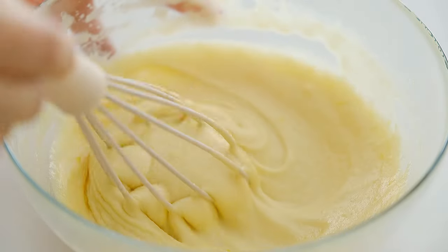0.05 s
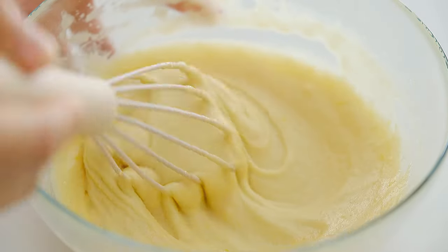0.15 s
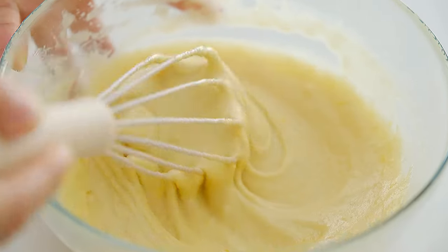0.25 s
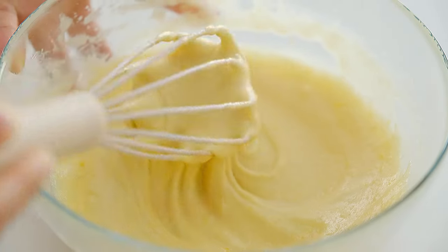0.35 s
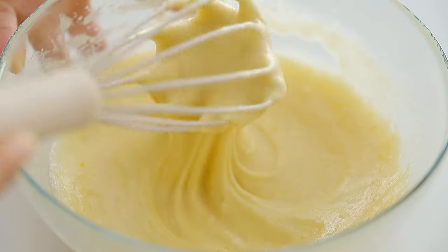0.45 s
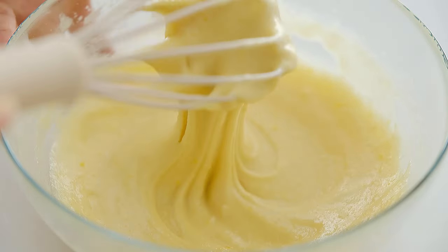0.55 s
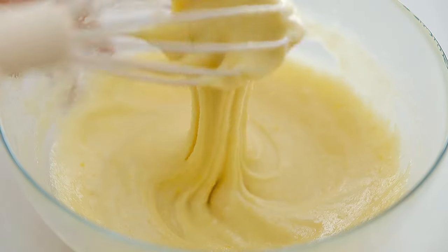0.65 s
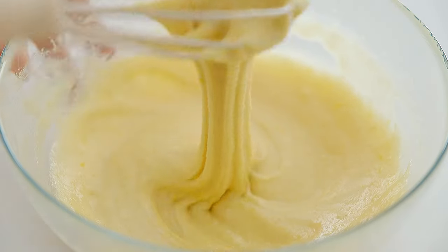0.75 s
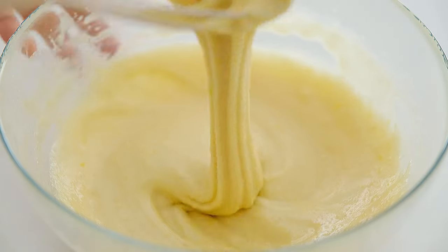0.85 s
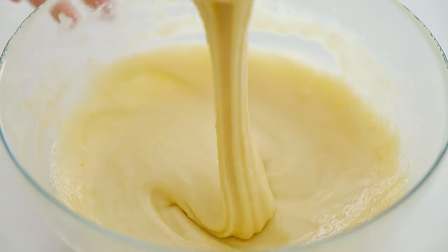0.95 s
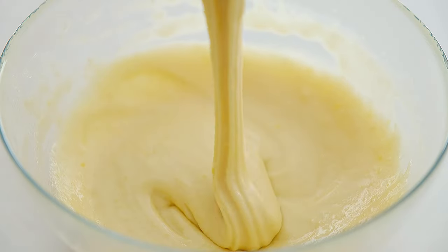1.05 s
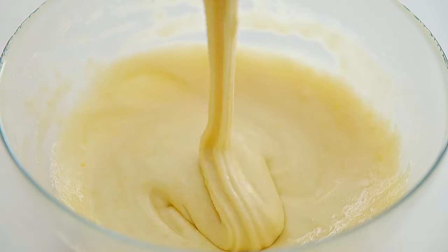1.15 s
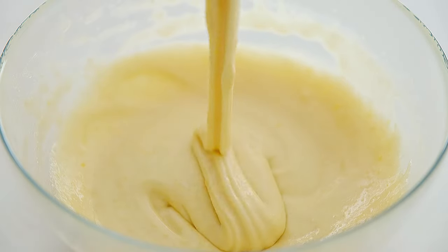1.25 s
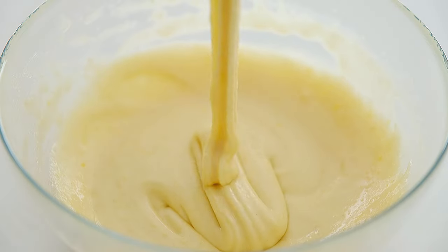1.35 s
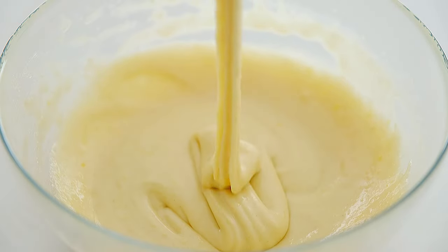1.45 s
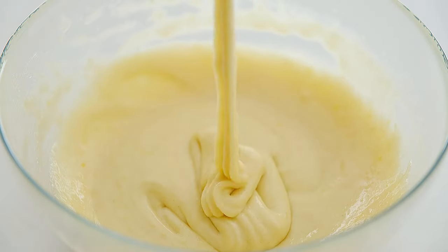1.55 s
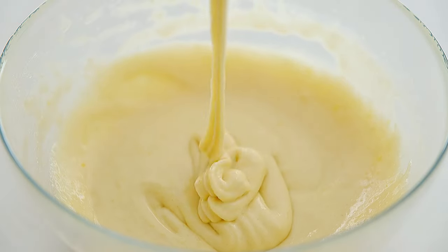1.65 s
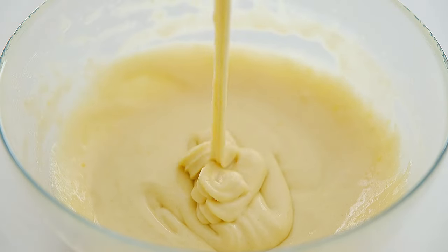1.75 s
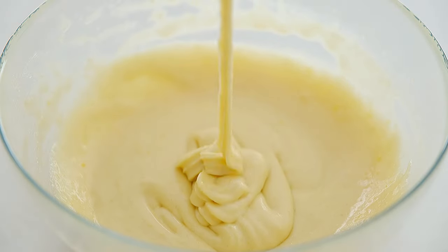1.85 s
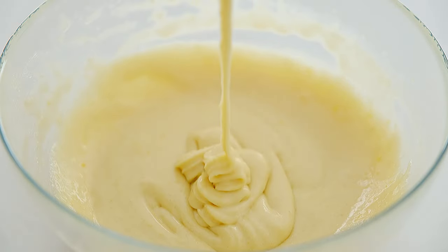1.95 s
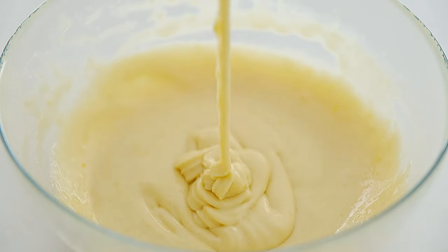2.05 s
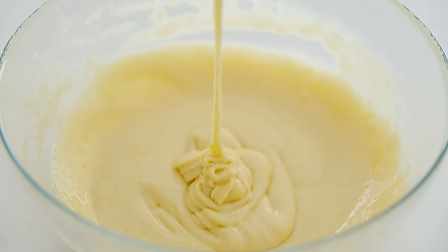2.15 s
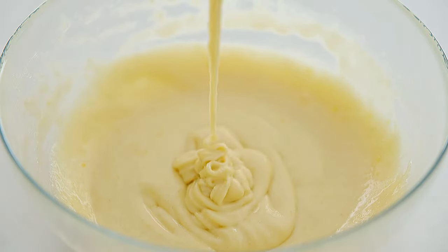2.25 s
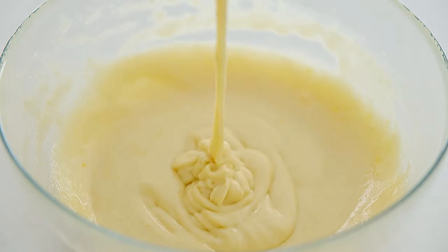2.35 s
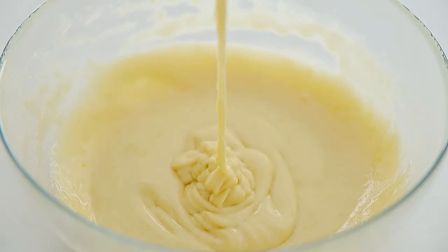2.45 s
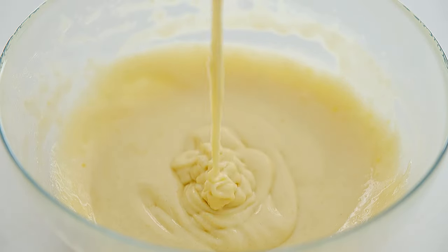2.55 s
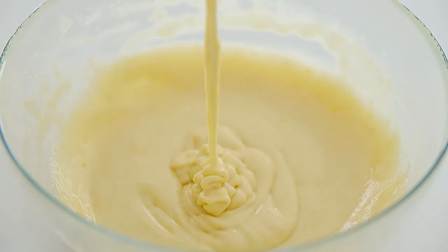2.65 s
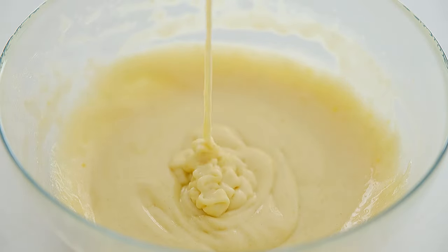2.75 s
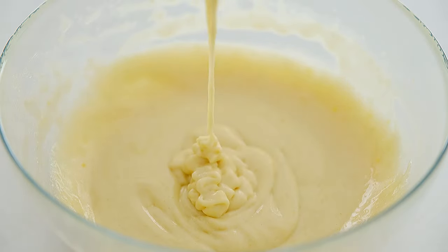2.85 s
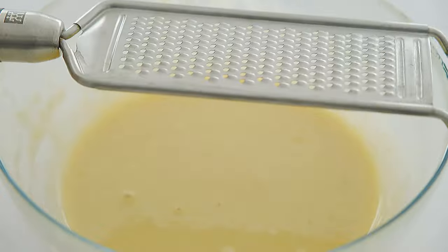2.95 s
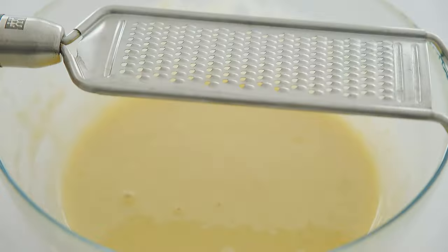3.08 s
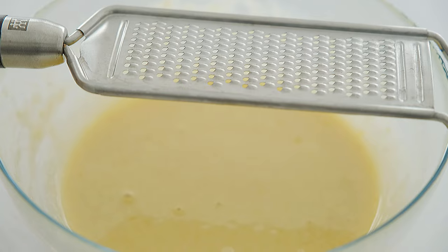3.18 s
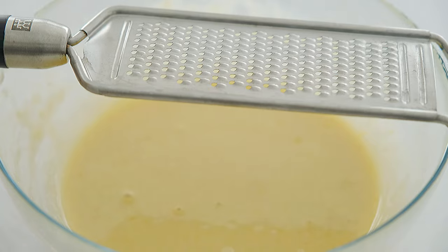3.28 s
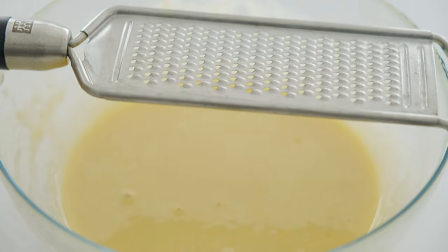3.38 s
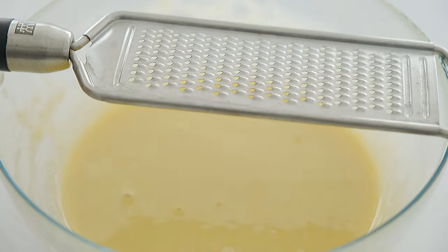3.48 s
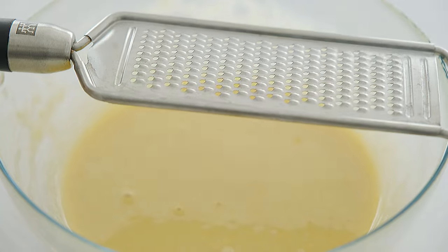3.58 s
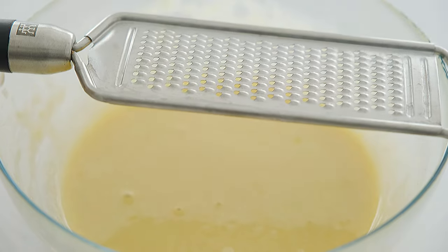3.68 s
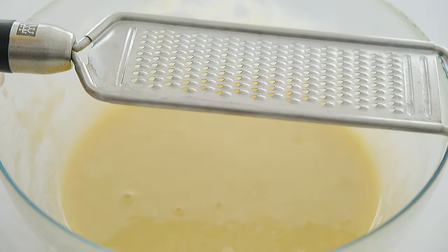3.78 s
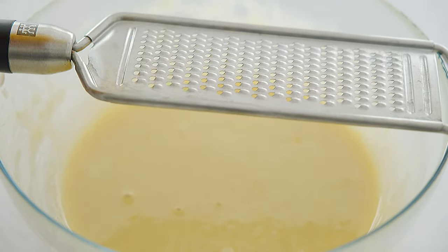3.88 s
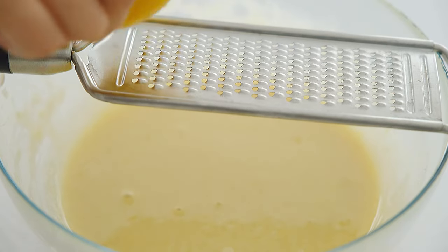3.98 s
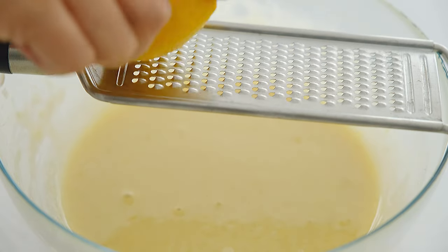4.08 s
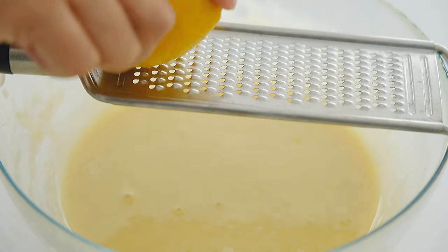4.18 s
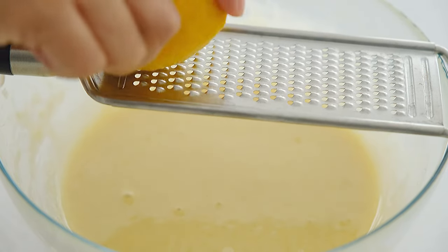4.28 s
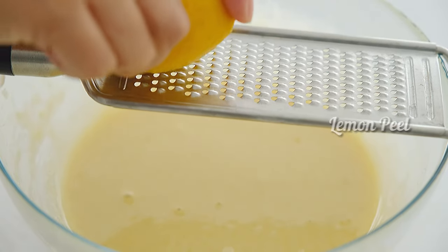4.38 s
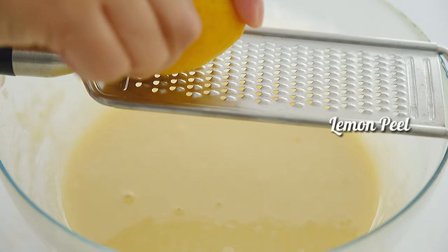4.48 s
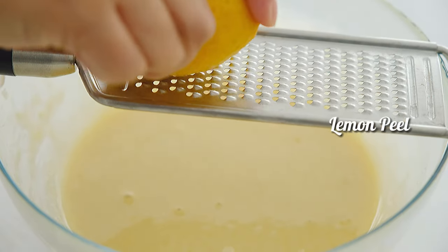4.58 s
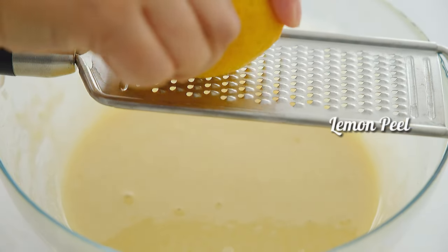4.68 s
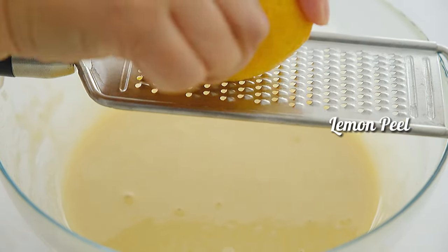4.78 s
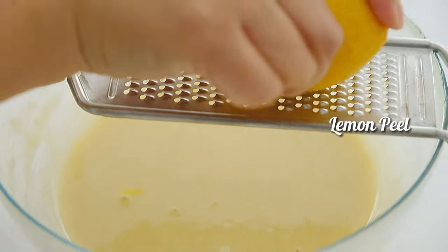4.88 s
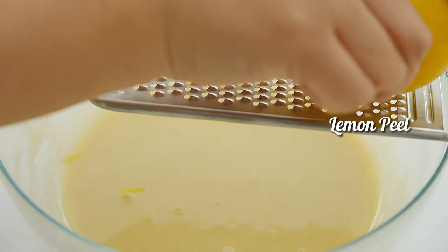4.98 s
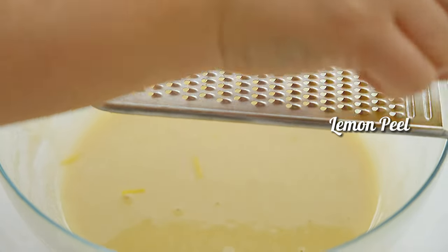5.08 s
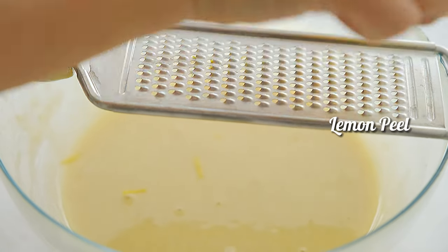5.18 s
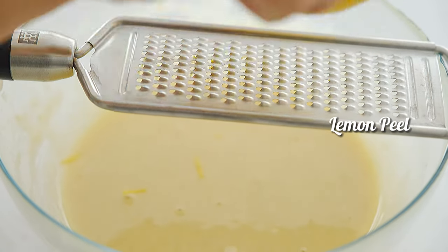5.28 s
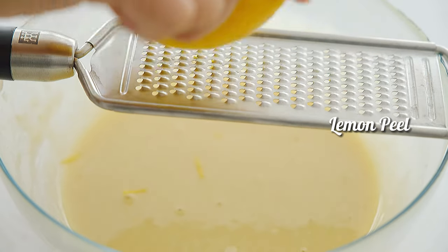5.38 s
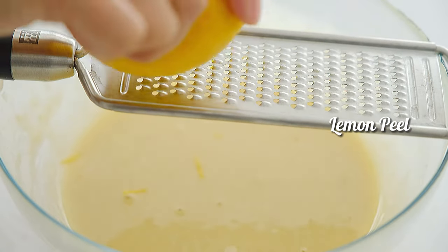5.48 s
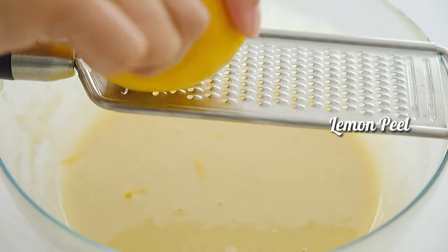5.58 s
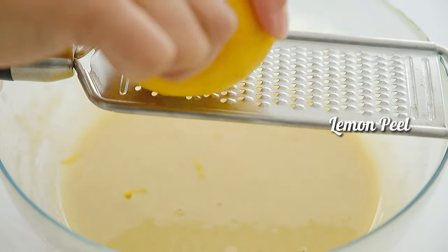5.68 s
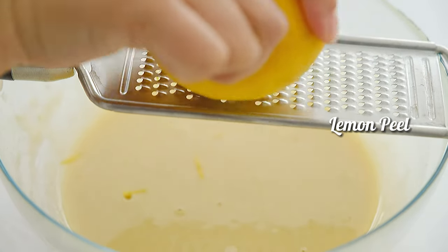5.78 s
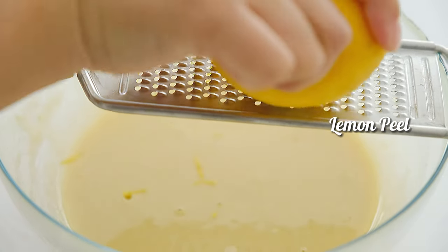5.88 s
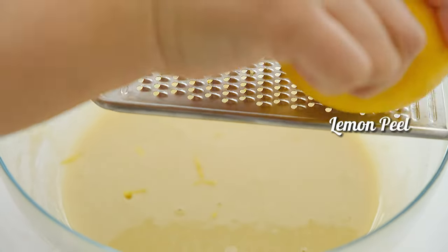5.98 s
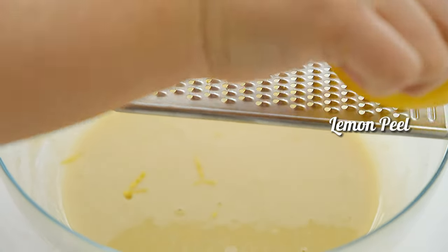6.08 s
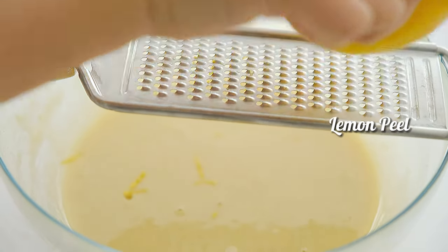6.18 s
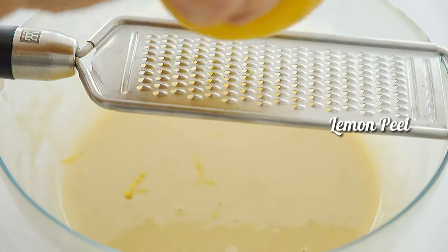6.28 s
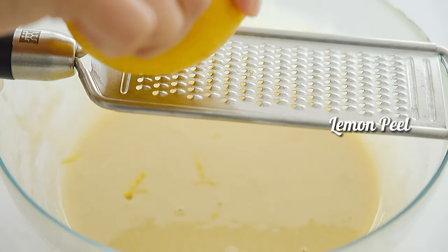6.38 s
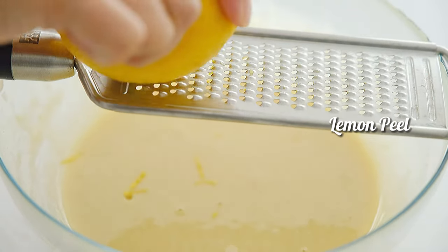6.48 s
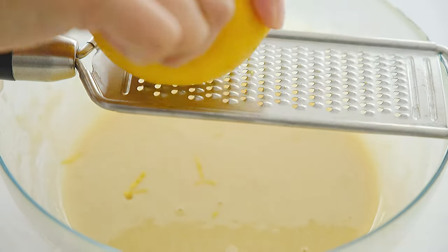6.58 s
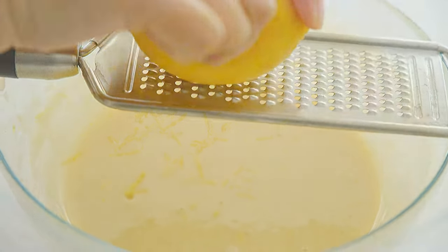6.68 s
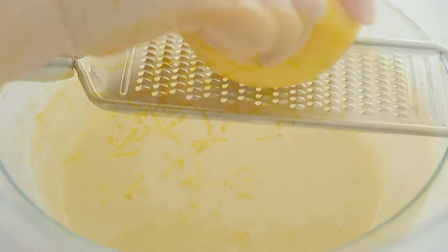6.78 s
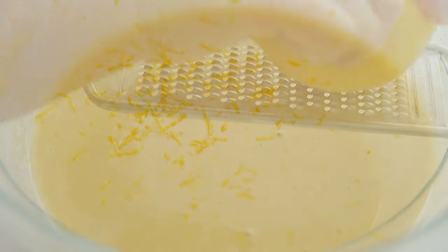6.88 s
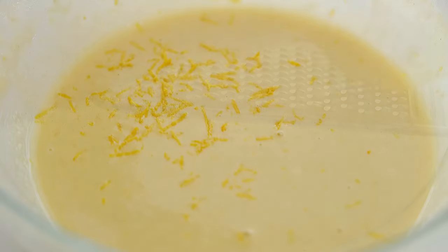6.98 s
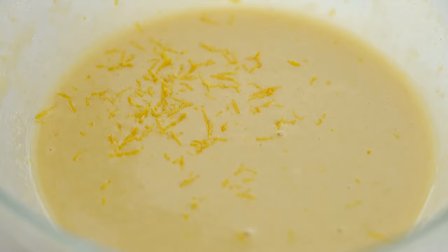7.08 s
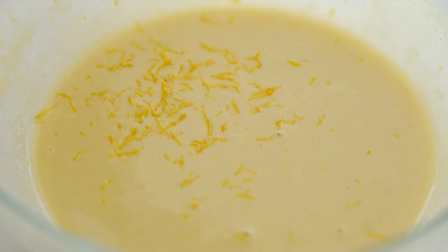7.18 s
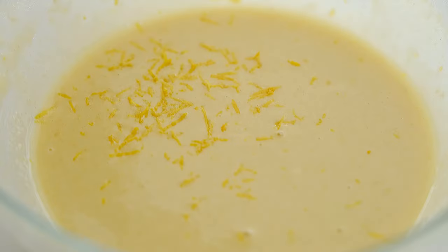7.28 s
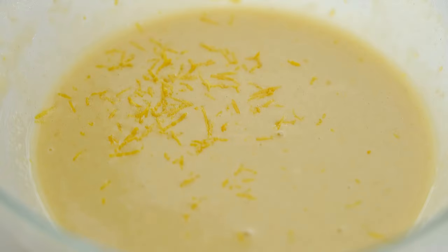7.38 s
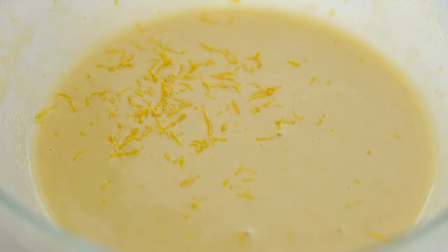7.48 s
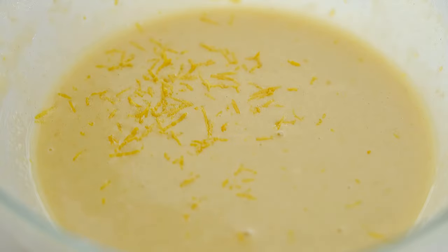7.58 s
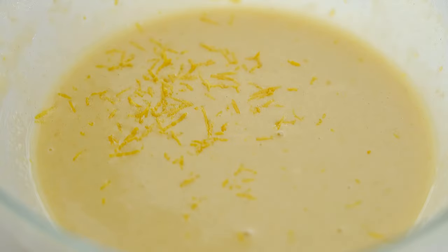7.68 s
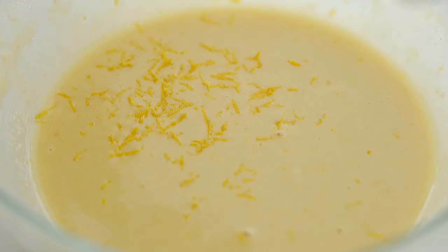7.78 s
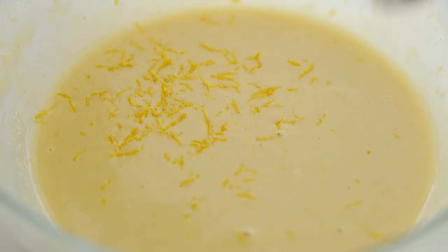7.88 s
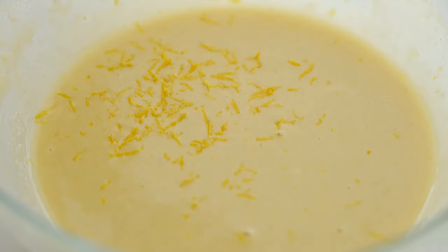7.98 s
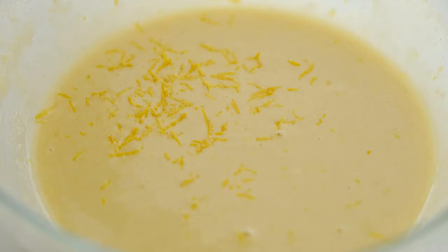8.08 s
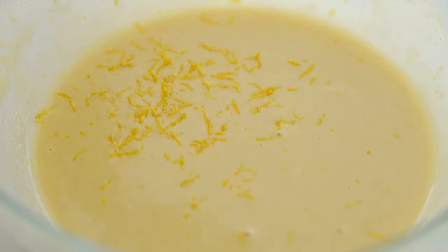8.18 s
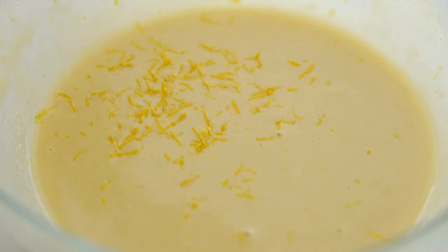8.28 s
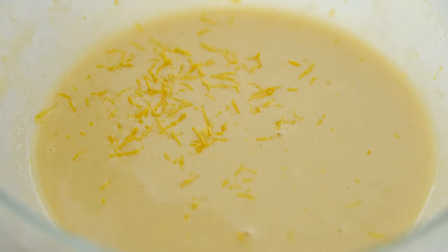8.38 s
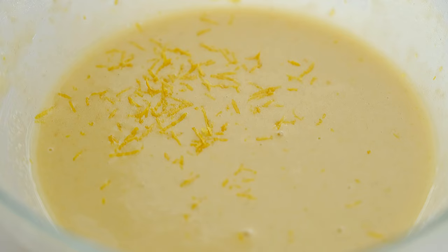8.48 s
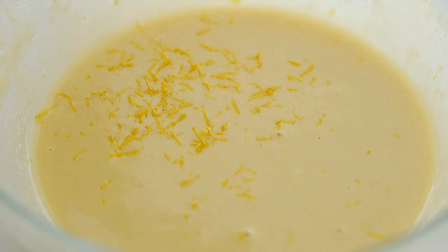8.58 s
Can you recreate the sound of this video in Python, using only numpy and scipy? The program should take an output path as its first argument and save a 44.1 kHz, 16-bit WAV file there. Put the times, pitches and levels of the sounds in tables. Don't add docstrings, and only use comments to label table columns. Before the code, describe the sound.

Nearly three seconds of thin hiss, gentle rustling and sparse distant drips, then two bright clanks of steel on glass with faint rattling. Peel is grated in three long, gritty stick-slip strokes separated by pauses, teeth snapping and singing. Four short, dry, brighter scratches follow at even gaps. Close, bass-light pickup with a small kitchen echo; background hiss shifts abruptly at times.

```python
import sys
import numpy as np
from scipy import signal
from scipy.fft import rfft, irfft, next_fast_len
from scipy.io import wavfile
from scipy.ndimage import uniform_filter1d, map_coordinates

SR = 44100
rng = np.random.default_rng(int(sys.argv[2]) if len(sys.argv) > 2 else 0)


def amplitude_ratio(level_db):
    exponent = np.asarray(level_db, float) / 20
    return 10 ** exponent


def unload_wav(signal):
    wavfile.write(
        sys.argv[1],
        SR,
        np.round(np.clip(np.atleast_2d(signal).T, -1, 1) * 32767).astype(np.int16),
    )


N = 381465
QUICK_FROM_S = 7.2


def unit(x):
    return x / np.sqrt(np.mean(x ** 2) + 1e-20)


def along(points, hz):
    f, v = np.transpose(points)
    return np.interp(np.log(hz + 1), np.log(f + 1), v)


def wobble(rate):
    return map_coordinates(rng.standard_normal(int(N * rate / SR) + 4), [np.arange(N) * rate / SR])


def filtered(x, response):
    m = next_fast_len(len(x) + 8192)
    return irfft(rfft(x, m) * response(np.fft.rfftfreq(m, 1 / SR)), m)[:len(x)]


def resonance(f, hz, width):
    return 1j * f * width / (hz * hz - f * f + 1j * f * width)


def above(f, hz):
    return 1 / np.sqrt(1 + (hz / (f + 1)) ** 8)


def below(f, hz):
    return np.sqrt(1 - above(f, hz) ** 2)


def swell(s, db, rise_s, fall_s):
    t = np.arange(N) / SR - s
    return amplitude_ratio(2 * db - 40 * np.maximum(-t / rise_s, t / fall_s))


def patchy(x, depth_db):
    z = signal.stft(x, nperseg=256)[2]
    field = rng.standard_normal(z.shape)
    field = uniform_filter1d(uniform_filter1d(field, size=2, axis=0), size=9, axis=1)
    return signal.istft(z * amplitude_ratio(depth_db * unit(field)), nperseg=256)[1][:N]


def grit(per_second, spread_db, smooth):
    hit = rng.random(N) < per_second / SR
    burst = hit * rng.standard_normal(N) * amplitude_ratio(spread_db * rng.standard_normal(N))
    return unit(unit(burst) + smooth * rng.standard_normal(N))


def curves(tables, fade_s):
    def edge(row, ds, db):
        return (row[0] + ds, db, *row[2:])

    rows = []
    for table in tables:
        first, last = table[0], table[-1]
        rows += [edge(first, -.004, -120), *table]
        rows += [edge(last, fade_s, last[1] - 30), edge(last, fade_s + .004, -120)]
    s, *cols = np.transpose(rows)
    return [np.interp(np.arange(N) / SR, s, c) for c in cols]


def grating():
    drag_db, speed = stroke_motion()
    quick = np.arange(N) / SR >= QUICK_FROM_S
    fine_slow_db, fine_fast_db = -25, 3
    thud_slow_db, thud_fast_db, quick_thud_db = -10, -24, -6
    fine_db = fine_slow_db + (fine_fast_db - fine_slow_db) * speed
    thud_db = thud_slow_db + (thud_fast_db - thud_slow_db) * speed + quick_thud_db * quick
    drag, slips = amplitude_ratio(2 * drag_db), slip_power()
    body = drag + slips
    fine = amplitude_ratio(2 * fine_db) * (body + amplitude_ratio(2 * 1) * slips)
    rub = patchy(grit(3000, spread_db=2.5, smooth=1.3), depth_db=4)
    tear = patchy(grit(6000, spread_db=3, smooth=1.2), depth_db=3)
    thud = patchy(rng.standard_normal(N), depth_db=3.5)
    low = plate(thud, lambda f: below(f, 800))
    mid = plate(rub, lambda f: above(f, 800) * below(f, 6800))
    high = plate(tear, lambda f: above(f, 6000))
    judder_db = 1.5 * wobble(250) - 0.36
    return amplitude_ratio(judder_db) * (np.sqrt(body) * (mid + amplitude_ratio(thud_db) * low) + np.sqrt(fine) * high)


# time_s [s], pressure_db [dB], speed [0-1]
LONG_STROKES = [
    [(4.369, -80, .9), (4.444, -56, .7), (4.505, -53, .6), (4.53, -43, .6), (4.679, -49, .65),
     (4.71, -34, .55), (4.82, -38, .4), (4.877, -48, .3), (5.0, -41, .05)],
    [(5.549, -63, .4), (5.57, -47, .4), (5.63, -35.5, .5), (5.719, -37, .5), (5.74, -29, .55),
     (5.895, -35.5, .4), (5.968, -37, .45), (6.013, -46, .45)],
    [(6.446, -70, .7), (6.486, -39, .5), (6.557, -47, .6), (6.572, -35, .5), (6.655, -47, .35),
     (6.72, -41, .5), (6.82, -33, .5), (6.885, -33, .4), (6.958, -54, .3)],
]
QUICK_STROKES = [
    [(7.25, -56, .5), (7.385, -68, .8), (7.4, -38.5, .6), (7.416, -28, .5), (7.475, -31.5, .7),
     (7.559, -59, .6)],
    [(7.714, -58, .5), (7.73, -58, .7), (7.748, -29, .7), (7.824, -30, .7), (7.898, -57.5, .7)],
    [(8.065, -50, .4), (8.074, -55.5, .6), (8.105, -26.5, .6), (8.17, -31.5, .6), (8.228, -49.5, .4)],
    [(8.49, -48.5, .4), (8.504, -61, .5), (8.544, -57.5, .7), (8.581, -43, .7), (8.646, -34, .8)],
]


def stroke_motion():
    drag_db, speed = curves(LONG_STROKES, .1)
    quick_db, quick_speed = curves(QUICK_STROKES, .03)
    quick = np.arange(N) / SR >= QUICK_FROM_S
    rows_db = 2 * wobble(55)
    return np.where(quick, quick_db, drag_db) + rows_db, np.where(quick, quick_speed, speed)


# middle_s [s], level_db [dB],
# length_ms [ms]
SLIPS = [(4.454, -47.5, 5.4), (4.486, -52, 9), (4.55, -28, 9), (4.565, -34, 22), (4.62, -29, 19.5),
         (4.645, -31.5, 17), (4.706, -28, 7.6), (4.742, -30, 24), (4.789, -25.5, 20), (4.801, -23.5, 6.3),
         (4.812, -27.5, 4.8), (4.96, -43, 24), (5.604, -37.5, 8.3), (5.644, -32, 10), (5.701, -32, 14),
         (5.753, -28, 11), (5.809, -31.5, 9), (5.826, -30.5, 6.5), (5.916, -31, 8.3), (5.967, -32, 4.5),
         (6.004, -40, 18), (6.474, -40, 9), (6.488, -27.5, 2.7), (6.509, -31.5, 12), (6.529, -35.5, 22),
         (6.582, -28, 13), (6.595, -21, 5.8), (6.611, -26, 5.7), (6.686, -31.5, 28), (6.754, -32.5, 31),
         (7.314, -43.7, 12), (7.418, -23, 2.5), (7.448, -32.5, 23), (7.489, -35.5, 10),
               (7.51, -38, 16), (7.759, -32.5, 6.7), (7.796, -31, 11), (7.855, -33.5, 4), (8.083, -46, 5.3),
               (8.096, -38.5, 5), (8.115, -29, 9), (8.531, -47.5, 5), (8.595, -29.5, 15),
               (8.635, -31.5, 20)]


def slip_power():
    power, t = np.zeros(N), np.arange(N) / SR
    for s, db, ms in SLIPS:
        near = slice(round((s - .1) * SR), round((s + .1) * SR))
        power[near] += amplitude_ratio(2 * db) * np.exp(-np.abs((t[near] - s) / (ms * 0.00058)) ** 3.3)
    return power


# pitch_hz [Hz], width_hz [Hz], lift_db [dB]
PLATE = [(760, 50, 3), (1340, 90, 7), (2030, 60, 5), (2530, 90, 4), (3340, 60, 4), (4090, 60, 4.5),
         (4870, 110, 5), (5940, 50, 5), (6450, 90, 3), (7810, 80, 5), (8720, 60, 7), (9510, 48, 3),
         (11400, 120, 4), (12170, 70, 4), (13000, 70, 4), (15000, 120, 4)]
# pitch_hz [Hz], density_db [dB per Hz]
PEEL = [(120, -68), (200, -33.5), (360, -23.5), (612, -17), (735, -10), (1020, -13), (1370, -0.5),
        (1680, -1.5), (4200, -2.5), (5630, -17), (7970, -16.5), (10500, -20.5), (14600, -21), (16000, -29)]
# pitch_hz [Hz], density_db [dB per Hz]
SCRATCH = [(150, -81), (250, -56), (380, -26.5), (788, -11.5), (1140, -8), (2620, 0), (7310, -12.5),
           (12500, -11.5), (16000, -18)]


def plate(x, keep):
    def modes(f):
        return 1 + sum((amplitude_ratio(db) - 1) * resonance(f, hz, w) for hz, w, db in PLATE)

    heavy = unit(filtered(x, lambda f: keep(f) * amplitude_ratio(along(PEEL, f)) * modes(f)))
    light = unit(filtered(x, lambda f: keep(f) * amplitude_ratio(along(SCRATCH, f)) * modes(f) ** .5))
    return np.where(np.arange(N) / SR < QUICK_FROM_S, heavy, light)


def clicks(events, cycles, crack):
    out, t = np.zeros(N + SR), np.arange(SR // 40) / SR
    for s, db, hz in events:
        pop = np.sin(2 * np.pi * hz * t) * np.exp(-t * hz / cycles)
        grain = filtered(rng.standard_normal(len(t)), lambda f: resonance(f, 3100, 5700))
        out[round(s * SR):][:len(t)] += amplitude_ratio(db) * (pop + crack * grain * np.exp(-t / .0008))
    return filtered(out[:N], lambda f: resonance(f, 2800, 5000) / (1 + (600 / (f + 1)) ** 4))


# start_s [s], peak_db [dB], pitch_hz [Hz]
SNAPS = [(4.552, -24.5, 3150), (4.627, -17.5, 2600), (4.704, -16.5, 2570), (4.78, -28, 1310),
         (4.798, -15, 4040), (4.811, -12.5, 4870), (4.831, -28.5, 1440), (4.992, -26, 1970),
         (5.675, -20, 3030), (5.754, -23, 1420), (5.823, -17, 1420), (5.874, -21.5, 1440),
         (5.912, -31, 1350), (5.962, -20, 3170), (6.486, -20.5, 1340), (6.591, -13.5, 1330),
         (6.606, -21.5, 2270), (7.418, -20, 2740), (7.746, -23.5, 2220), (7.767, -20, 2420),
         (7.794, -16.5, 4000), (8.117, -17.5, 3300), (8.591, -17, 2970)]


def tooth_snaps():
    return clicks(SNAPS, cycles=3, crack=.6)


# start_s [s], length_s [s], pitch_hz [Hz], level_db [dB]
SINGING = [(.565, 0.02, 4840, -61), (.565, 0.067, 3478, -74), (.565, 0.018, 8170, -70),
           (1.445, .03, 4060, -72), (4.2, 0.053, 1357, -64.5), (4.95, 0.045, 8710, -56.5),
           (4.96, 0.029, 11500, -63), (4.98, 0.041, 4120, -47), (4.982, .04, 2050, -46),
           (5.627, 0.087, 8740, -45.5), (5.771, 0.022, 8710, -47.5), (5.74, 0.044, 15200, -49.5),
           (5.96, 0.024, 14100, -54), (5.73, 0.035, 9510, -47), (5.69, 0.027, 12160, -45.5),
           (5.74, .06, 1407, -42), (5.8, 0.058, 1313, -42.5), (6.668, 0.13, 8710, -47),
           (6.88, 0.035, 11500, -55), (6.896, 0.093, 5940, -71), (6.8, 0.087, 4085, -39)]


def singing():
    out = np.zeros(N)
    for s, length, hz, db in SINGING:
        n = round(length * SR)
        tone = filtered(rng.standard_normal(n), lambda f: resonance(f, hz, 30) ** 2)
        out[round(s * SR):][:n] += amplitude_ratio(db) * unit(tone) * np.hanning(n) ** .5
    return out


# start_s [s], peak_db [dB], pitch_hz [Hz], treble_db [relative dB], t60_s [s]
TAPS = [(1.394, -41.5, 1490, -40, .035), (1.404, -55, 1590, -40, .15), (2.952, -18, 4500, -13.5, .014),
        (3.012, -44.5, 2000, -11.5, .017), (3.102, -43.5, 1320, -40, .12), (3.308, -54.5, 2270, -15, .024),
        (3.438, -14.5, 4860, -22.5, .024), (4.078, -19, 2620, -20, .032), (4.088, -24, 1330, -20, .063),
        (4.196, -24, 1410, -25.5, .04), (5.208, -45, 2890, -26, .027), (5.5015, -23, 11300, -12, .006),
        (5.509, -26.5, 2700, -12.5, .051), (6.39, -39, 2704, -19, .063), (7.226, -11.5, 4000, -3, .021),
        (7.694, -20, 2560, -16, .023), (8.048, -24, 2680, -8, .028), (8.477, -17.5, 3970, -12, .035)]


def knocks():
    out, t = np.zeros(N + SR), np.arange(SR // 8) / SR
    for k, (s, db, hz, treble_db, t60) in enumerate(TAPS):
        thud_db = -18 + 7 * np.log2(t60 / .03)
        noise = rng.standard_normal((3, len(t)))

        def colour(f):
            return .5 * resonance(f, .6 * hz, 1.3 * hz) ** 2 + resonance(f, hz, .1 * hz)

        dull = unit(filtered(noise[0], lambda f: colour(f) / (1 + (700 / (f + 1)) ** 4)))
        thud = unit(filtered(noise[1], lambda f: resonance(f, 750, 470) ** 2))
        sharp = unit(filtered(noise[2], lambda f: 1 / (1 + (5000 / (f + 1)) ** 4)))
        hold_s = .0095 * (k == 2)
        fall_db = -60 * np.maximum(t - hold_s, 0) / t60
        rattle = dull + amplitude_ratio(thud_db - 0.11 * fall_db) * thud + amplitude_ratio(treble_db + 1.2 * fall_db) * sharp
        attack = 1 - np.exp(-t / 0.00016)
        out[round(s * SR):][:len(t)] += amplitude_ratio(db - 7 + fall_db) * attack * rattle
    return out[:N]


def during(take, s):
    return take == take[round(s * SR)]


# [upper modes, relative dB]
FRAME = [
    (2.967, -50, .003, .03, 6),
    (3.1, -58, .25, .02, -8),
    (3.2, -60, .9, .12, -8),
    (3.394, -58, .14, .2, -12),
    (3.449, -33, .003, .018, 0),
    (3.466, -54, .003, .1, 1),
    (3.52, -64, .05, .5, -7),
    (3.712, -50, .1, .22, -10),
]
# pitch_hz [Hz], width_hz [Hz], level_db [dB]
STEEL = [(1370, 24, -6), (1710, 12, -14), (2030, 20, -7), (2290, 12, -1), (2490, 10, -11), (3012, 10, -3),
         (3515, 10, 1.5), (3558, 10, 1.5), (3750, 20, -13), (4425, 10, -7), (4840, 14, -3), (4947, 10, -1),
         (5940, 30, -19), (6438, 10, -8), (8090, 20, -25)]


def frame_and_bowl(take):
    noise = rng.standard_normal(N)

    def steel(f):
        modes = sum((-1) ** k * amplitude_ratio(db) * resonance(f, hz, w) for k, (hz, w, db) in enumerate(STEEL))
        return modes + amplitude_ratio(-19) * resonance(f, 2500, 3500)

    def glass(f):
        return (resonance(f, 610, 50) + 0.083 * resonance(f, 350, 250)) * (f < 1000)

    lower = unit(filtered(noise, lambda f: (f > 1000) * (f < 2700) * steel(f)))
    upper = unit(filtered(noise, lambda f: (f > 2700) * steel(f)))
    bowl = unit(filtered(noise, glass))
    power = np.array([swell(*row[:4]) * during(take, row[0]) for row in FRAME])
    lower_power = power.sum(axis=0)
    upper_power = amplitude_ratio(2 * np.transpose(FRAME)[4]) @ power
    rim_struck = swell(3.1, -67, .01, .5) * during(take, 3.1)
    bowl_power = amplitude_ratio(2 * -26) * lower_power + rim_struck
    chatter = amplitude_ratio(-3) * (np.sqrt(lower_power) * lower + np.sqrt(upper_power) * upper)
    return chatter + np.sqrt(bowl_power) * bowl


# start_s [s], ring_db [dB]
CLANKS = [
    (2.953, -56),
    (3.439, -52),
]
# pitch_hz [Hz], level_db [dB], t60_s [s]
RING_FIRST = [(1367, 0, 0.075), (2019, -11, 0.6), (2288, -8, 0.19), (2514, -20, 0.86), (3009, -11, 0.52),
              (3515, -11, 1.6), (4430, -12, 0.53), (4840, -6, 0.44), (5943, -24, 0.64), (6438, -17, 0.35)]
RING_SECOND = [(1410, -16, 0.54), (2089, -6, 0.45), (2288, -3, 0.14), (3015, 0, 0.29), (3558, -9, 0.71),
               (4414, -20, 0.59), (4657, -19, 0.42), (4947, -11, 0.53), (6438, -8, 0.17), (8113, -36, 0.55)]


def frame_ringing(take):
    out = np.zeros(N)
    for (s, db), modes in zip(CLANKS, (RING_FIRST, RING_SECOND)):
        t = np.maximum(np.arange(N) / SR - s, 0)
        heard = during(take, s + .02)
        for hz, level_db, t60 in modes:
            fall_db = -60 * t / t60 + 1.5 * wobble(30)
            out += heard * amplitude_ratio(db + level_db + fall_db) * np.sin(2 * np.pi * hz * t)
    return out


# start_s [s], peak_db [dB], pitch_hz [Hz]
DRIPS = [(0.567, -45, 4800), (1.438, -37.5, 4170), (2.309, -53, 4150), (2.596, -54.5, 3400),
         (2.665, -47.5, 4100), (5.164, -46.5, 2380), (5.434, -60, 2830)]


def dripping():
    return clicks(DRIPS, cycles=4, crack=.1)


# pitch_hz [Hz], t60_s [s]
KITCHEN = [(300, 0.27), (2000, 0.46), (5000, 0.4), (8000, 0.1), (15000, .15)]


def kitchen(x):
    hz, t, z = signal.stft(rng.standard_normal(SR // 2), SR, nperseg=256)
    hz = hz[:, None]
    decay = amplitude_ratio(-60 * t / along(KITCHEN, hz)) / (1 + (hz / 7500) ** 2)
    tail = signal.istft(z * decay, SR, nperseg=256)[1]
    return signal.fftconvolve(np.pad(x, (200, 0)), tail / np.linalg.norm(tail))[:N]


# peak_s [s], level_db [dB], rise_s [s per 20 dB], fall_s [s per 20 dB]
RUSTLE = [
    (.09, -60, .25, .04),
    (.804, -61.5, .2, .4),
    (2.676, -63, .03, .03),
    (2.77, -75, .8, .05),
]


def rustle():
    soft = unit(filtered(rng.standard_normal(N), lambda f: resonance(f, 1600, 1500) ** 2))
    power = sum(swell(*row) for row in RUSTLE)
    return np.sqrt(power) * amplitude_ratio(-9 + 1.2 * wobble(28)) * soft


# pitch_hz [Hz], density_db [dB per Hz]
HISS = [(59, -68), (100, -46.5), (308, -24.5), (389, -5), (424, -12.5), (535, -1.5), (676, -7), (721, -2),
        (784, -4), (1200, -2.5), (1910, -5), (13200, -10.5), (16000, -8.5)]


def microphone_hiss(hiss_db, treble_db):
    def lines(f):
        return 1 + .8 * resonance(f, 3318, 30) + 1.4 * resonance(f, 543, 8.2)

    hiss = unit(filtered(rng.standard_normal(N), lambda f: amplitude_ratio(along(HISS, f)) * lines(f)))
    treble = filtered(hiss, lambda f: 1 / (1 + (7000 / (f + 1)) ** 4))
    return amplitude_ratio(hiss_db) * (hiss + (amplitude_ratio(treble_db) - 1) * treble)


# [echo kept, dB]
TAKES = [(0, -66.5, 0.5, -4.5), (2.838, -84, -2.5, 1), (2.96, -86.5, -12, -4), (3.43, -82.5, -12, -7.5),
         (3.693, -63.5, -4, -2), (4.3, -74, -0.5, -0.5), (7.021, -75, -0.5, -13.5), (7.2, -72, -0.5, 2),
         (8.387, -76, 2, -7), (8.44, -69, 3, -0.5)]


def scene():
    s, hiss_db, treble_db, echo_db = np.transpose(TAKES)
    take = np.searchsorted(s, np.arange(N) / SR, side="right") - 1
    work = grating() + tooth_snaps() + singing() + knocks()
    steel = frame_and_bowl(take) + frame_ringing(take)
    drips = dripping()
    echo = amplitude_ratio(echo_db[take] - 17.5) * kitchen(work + amplitude_ratio(10) * drips)
    background = rustle() + microphone_hiss(hiss_db[take], treble_db[take])
    return (work + steel + drips + echo + background)[None]


def low_pass(x):
    return signal.sosfilt(signal.butter(12, 16540, fs=SR, output="sos"), x)


def record(dry):
    cut = filtered(dry[0], lambda f: (f < 15900) / np.sqrt(1 + (250 / (f + 1)) ** 16))
    return low_pass(cut[None] + 1e-4)


dry = scene()
out = record(dry)
unload_wav(out)
```